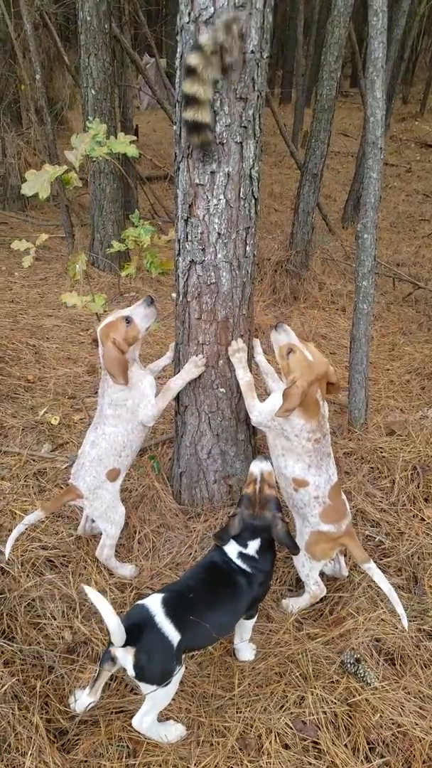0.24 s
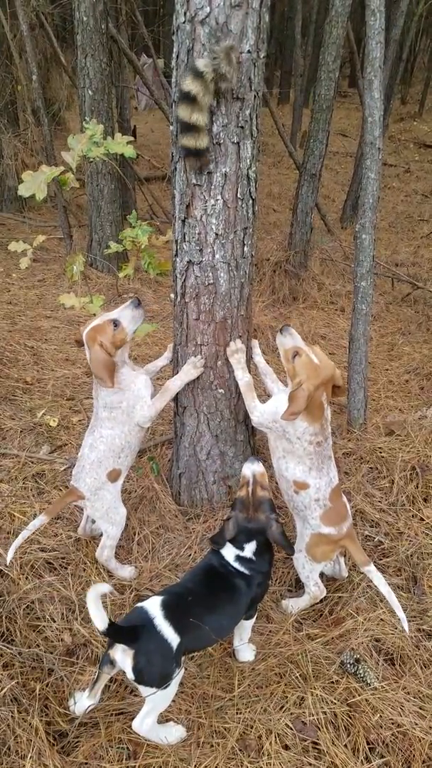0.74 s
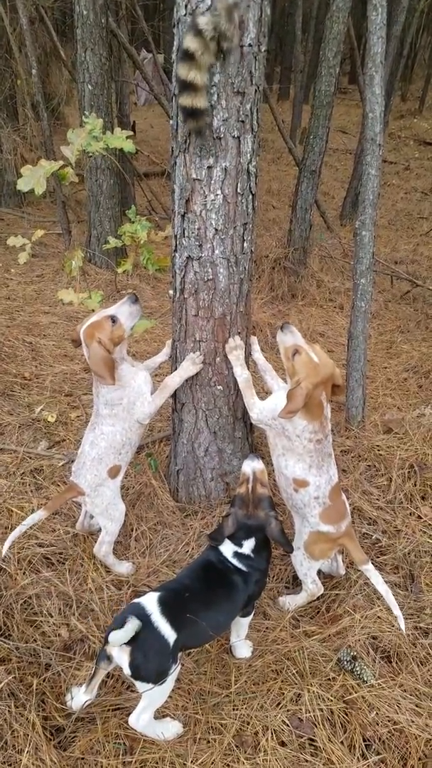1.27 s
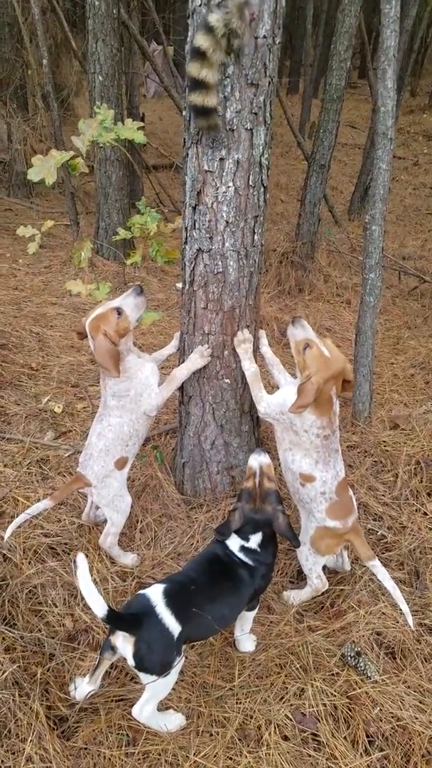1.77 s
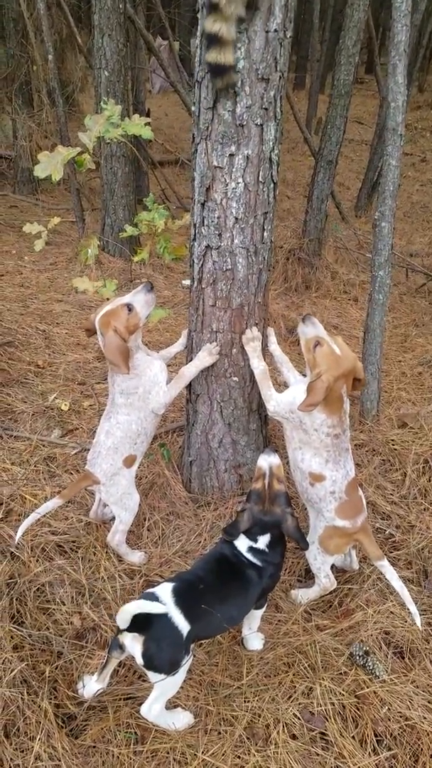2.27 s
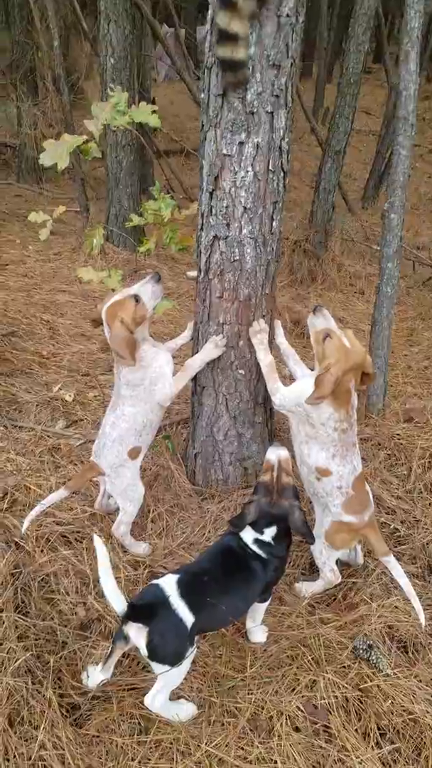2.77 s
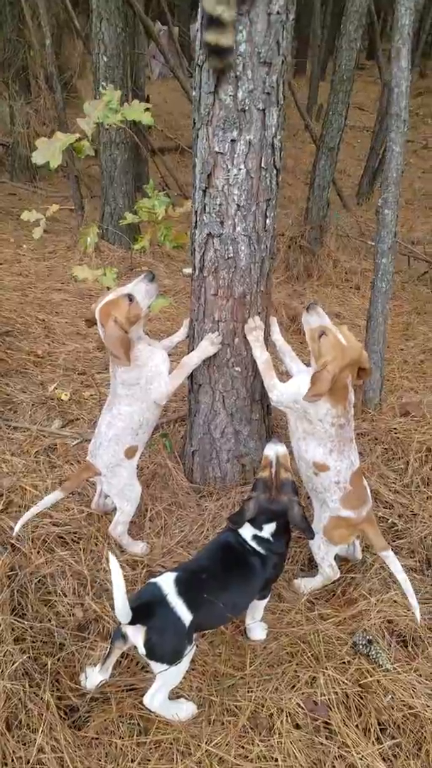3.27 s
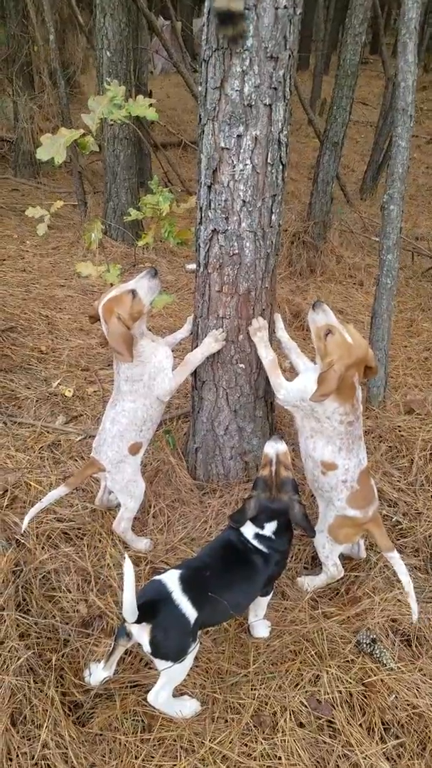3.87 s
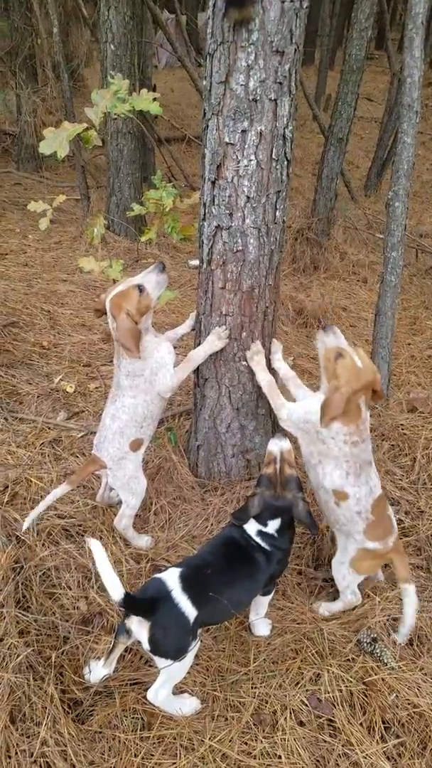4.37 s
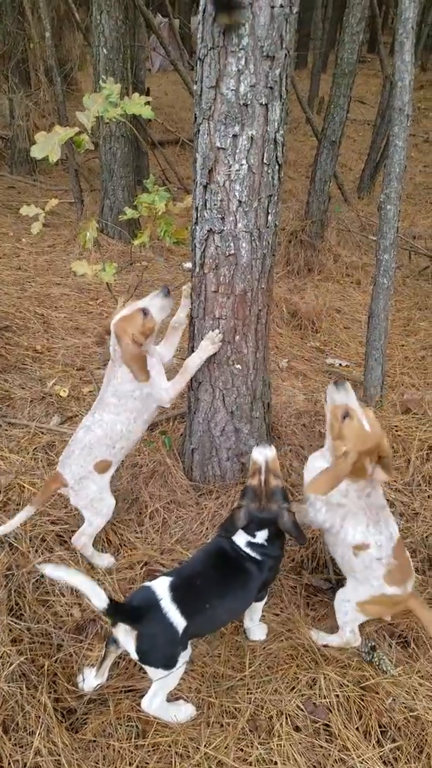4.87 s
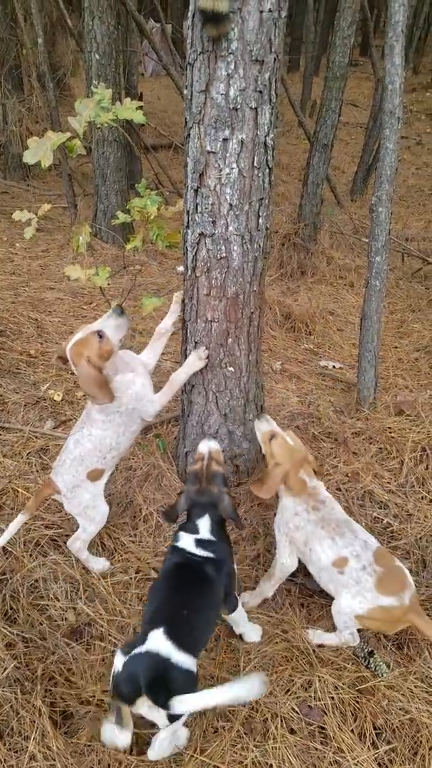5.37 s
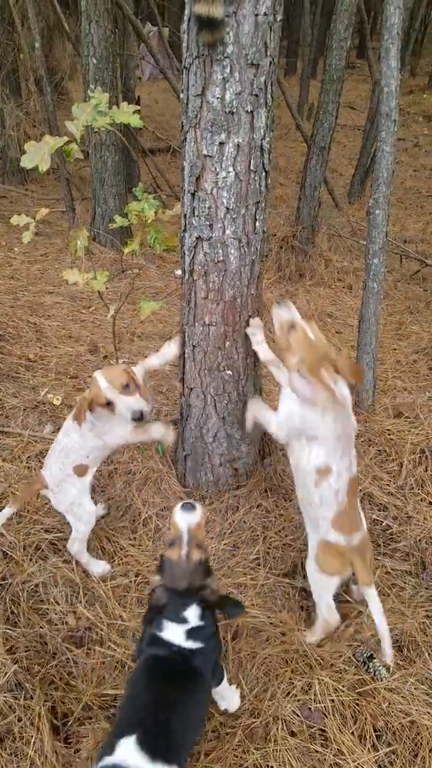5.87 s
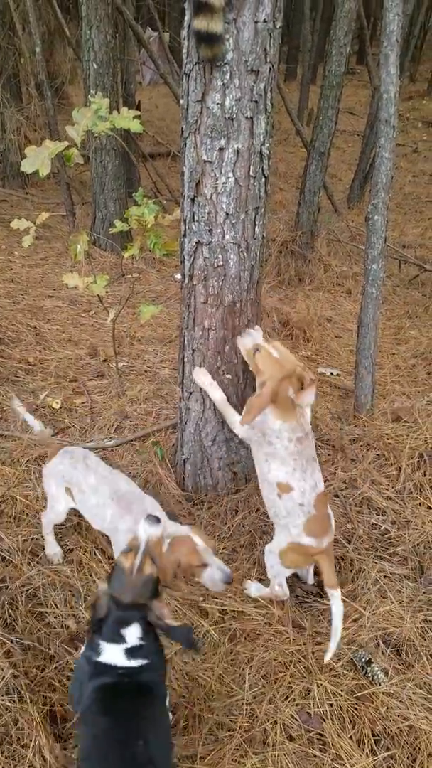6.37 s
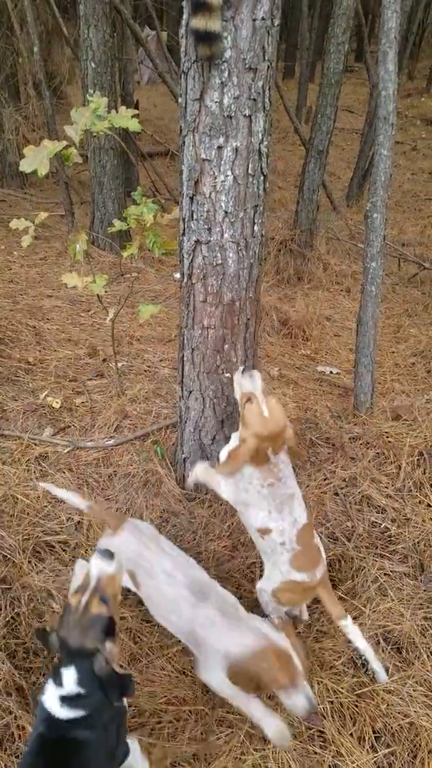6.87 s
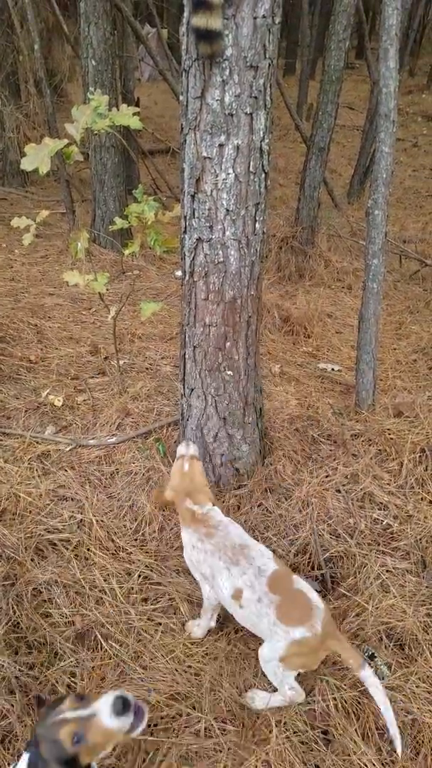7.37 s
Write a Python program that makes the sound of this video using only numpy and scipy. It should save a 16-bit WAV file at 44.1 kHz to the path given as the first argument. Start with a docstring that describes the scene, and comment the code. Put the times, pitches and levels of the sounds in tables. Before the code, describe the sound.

Quiet woodland air with a soft low rumble, and the tail of an earlier bay dying away. At about 0.2 and 0.8 s a hound slightly off bays: a tiny squeak, a bright nasal note, then a jump to a higher, duller one, echoing among trunks. From 1 to 3.5 s only echo, sparse crackles of paws on dry needles and very faint thin whines. Bays resume at 3.5, 4.2, 4.5 and 5.1 s, with low moans under some and busier claw scrabbling around 4.2 s. Close pups yelp, weakly at 4.4, then loud and cracking to hoarse at 4.9 s. Litter rustles hard at 5.5-5.7 s as another sharp yelp turns raspy. More yelps and rough barks come at 6.3, 6.7 and 7.2-7.4 s, among weaker bays at 6.1 and 6.9 s. Soft paw thumps fall near 4.5-4.7, 6 and 7.4 s; echoes linger at the end.

```python
"""Young hounds under a pine

One hound bays a little way off, each bay a squeak and two notes of summed sines echoing among the trunks.
Pups close by whine thinly, then yelp: gliding sines in the clear register, uneven pulses in the hoarse one.
Paws and claws crackle on dry needles and bark (bursts of random grains), pups land softly (short low sines),
and shaped noise makes the low outdoor rumble and air.
"""
import sys
import numpy as np
from scipy import signal
from scipy.fft import rfft, irfft
from scipy.io import wavfile

SR = 44100
rng = np.random.default_rng(int(sys.argv[2]) if len(sys.argv) > 2 else 0)


def put_to_file(sound):
    """Save the sound as 16-bit audio at rate SR, in the file named by the first command-line argument."""
    columns = np.atleast_2d(sound).T  # one column per channel
    safe = np.clip(columns, -1, 1)
    whole_steps = np.round(safe * 32767)
    wavfile.write(sys.argv[1], SR, whole_steps.astype(np.int16))


N = 336483
HZ = np.maximum(np.arange(N // 2 + 1) * SR / N, 1)
CUTOFF_HZ = 16350
NEAR_SINE = [(100, 0), (16000, -260)]   # throat of squeaks, moans and whines: Hz, dB


def from_db(db):
    """Gain of a level."""
    return 10 ** (np.asarray(db) / 20)


def rms_one(x):
    """Scaled to rms 1."""
    return x / np.sqrt(np.mean(x ** 2) + 1e-20)


def at_hz(points, hz):
    """A spectrum read on a log-frequency axis."""
    points = np.array(points)
    return np.interp(np.log(hz), np.log(np.maximum(points[:, 0], 1)), points[:, 1])


def span(rows):
    """Sample indices of a curve, and its columns sample by sample."""
    s, *columns = np.transpose(rows)
    at = np.arange(round(s[0] * SR), min(round(s[-1] * SR), N))
    return at, [np.interp(at / SR, s, c) for c in columns]


def edge_fade(at, fade_s):
    """Linear fade in and out over a run of samples."""
    return np.minimum(1, np.minimum(at - at[0], at[-1] - at) / (fade_s * SR))


def drift(size, rate_hz, count=1):
    """Rows of slow chance, rms 1 over all rows: white noise through a two-pole low-pass."""
    r = np.exp(-2 * np.pi * rate_hz / SR)
    noise = rng.standard_normal((count, size + 2000))
    return rms_one(signal.lfilter([1], [1, -2 * r, r * r], noise)[:, 2000:])


def coloured(x, gain):
    """x through a frequency response."""
    return irfft(rfft(x) * gain, N)


def above(x, hz):
    """Steep high-pass."""
    return signal.sosfilt(signal.butter(6, hz, "high", fs=SR, output="sos"), x)


def two_ears(x, balance_db, left_lead_rad):
    """Left and right of a near source: level and phase differ by frequency, summed power does not."""
    half = from_db(at_hz(balance_db, HZ) / 2) * np.exp(.5j * left_lead_rad)
    sides = np.array([half, 1 / half]) / np.hypot(abs(half), 1 / abs(half))
    return coloured(x, np.sqrt(2) * sides)


def clear_voice(calls, throat, waver, breath_db):
    """Sines on the pitch, higher partials following the throat; turbulence blurs every partial a little."""
    out = np.zeros(N)
    for rows in calls:
        at, (pitch, *levels) = span(rows)
        phase = 2 * np.pi * np.cumsum(pitch * (1 + waver * drift(len(at), 40)[0])) / SR
        # partials beyond the given ones continue from the last of them
        last = levels[-1] - at_hz(throat, len(levels) * pitch)
        levels += [last + at_hz(throat, k * pitch) for k in range(len(levels) + 1, 11)]
        k = np.arange(1, 11)[:, None]
        blur = 1 + from_db(breath_db) * (k - .8) * drift(len(at), 150, count=10)   # high partials tear most
        partials = from_db(levels) * blur * np.sin(k * phase) * (k * pitch < CUTOFF_HZ)
        out[at] += np.sqrt(2) * edge_fade(at, .0022) * np.sum(partials, axis=0)
    return out


def swells(table, end_db=-14, edge_db=-3):
    """Curves (s, Hz, dB, octave dB) of thin calls that fade in, are loudest in the middle and fade out."""
    share = np.array([0, .15, .5, .85, 1])
    shape_db = np.array([end_db, edge_db, 0, edge_db, end_db])
    curves = []
    for s, length_s, *hz, db, octave_db in table:
        pitch = np.interp(share, [0, .5, 1], hz)
        level = db + shape_db
        curves.append(np.transpose([s + share * length_s, pitch, level, level + octave_db]))
    return curves


# Baying hound. Each row: bright note start in seconds, its pitch in Hz, length in seconds, level in dB,
# octave over it in dB, squeak lead in seconds, squeak level in dB, jump after the start in seconds, dull note
# onset in Hz, pitch it glides to in Hz, its crest after the jump in seconds, crest level in dB.
# Levels are before the hound's gain in scene().
BAYS = [ (0.157, 436, 0.14, -30, -1.5, .022, -43, .078, 484.6, 536.7, 0.025, -20.5),
        (0.805, 469.3, 0.098, -26, -2.5, 0.023, -37.5, 0.048, 526.5, 534.5, 0.039, -19.5),
        (3.501, 495, 0.096, -23.5, -6.5, 0.026, -45.5, .038, 546, 541.8, 0.025, -24.5),
        (4.21, 479.3, 0.11, -19.5, -10.5, 0.021, -36.5, 0.029, 526.7, 540.3, 0.041, -23.5),
        (4.53, 442.1, .11, -26.5, -2, .025, -39, .08, 486.5, 535, 0.06, -21),
        (5.112, 437, 0.082, -34, 2.5, 0.039, -33, 0.044, 468.7, 518.3, 0.065, -20),
        (6.138, 425.8, 0.083, -42, 6.5, 0.021, -44.5, .057, 477, 497, 0.036, -26),
        (6.87, 426.4, 0.048, -35.5, -16, .02, -56, 0.027, 457, 490, 0.031, -32),
        (7.383, 396.5, 0.068, -35.5, -4.5, .02, -62, .04, 420, 428, .02, -48), ]
SQUEAK_RISE_S, SQUEAK_OVERLAP_S, SQUEAK_START_DB, SQUEAK_END_DB = .008, .0089, -8.5, -.5
SQUEAK_FROM, SQUEAK_TO = 3.05, 2.3   # multiples of the bright note's pitch
SWELL_SHARE, SWELL_FROM_DB, SWELL_TO_DB = .45, -7.5, -9   # the bright note swells and sinks
SWELL_BEND = 1.04   # and bends up as it sinks
JUMP_DB, CLIMB_S, DULL_FADE_S, DULL_FADE_DB = -8, .0596, .078, -16
DULL_SAG, DULL_OCTAVE_DB = .91, -12   # pitch multiple sagged towards, octave over the dull note


def bays():
    """Curves of falling squeak (s, Hz, dB), bright note, then higher dull note (s, Hz, dB, octave dB)."""
    squeaks, brights, dulls = [], [], []
    for (s, hz, length_s, db, octave_db, lead_s, squeak_db,
         jump_s, jump_hz, top_hz, crest_s, crest_db) in BAYS:
        start = s - lead_s
        squeaks.append([(start, SQUEAK_FROM * hz, squeak_db + SQUEAK_START_DB),
                        (start + SQUEAK_RISE_S, SQUEAK_FROM * hz, squeak_db),
                        (s + SQUEAK_OVERLAP_S, SQUEAK_TO * hz, squeak_db + SQUEAK_END_DB)])
        shape = [(0, 1, SWELL_FROM_DB), (SWELL_SHARE, 1, 0), (1, SWELL_BEND, SWELL_TO_DB)]
        brights.append([(s + share * length_s, bend * hz, db + d, db + d + octave_db)
                        for share, bend, d in shape])
        end = crest_s + DULL_FADE_S
        t = np.unique([0, crest_s, CLIMB_S, end])
        level = crest_db + np.interp(t, [0, crest_s, end], [JUMP_DB, 0, DULL_FADE_DB])
        pitch_hz = [jump_hz, top_hz, DULL_SAG * top_hz]
        pitch = np.interp(t, [0, CLIMB_S, max(end, CLIMB_S + 1e-3)], pitch_hz)
        dulls.append(np.transpose([s + jump_s + t, pitch, level, level + DULL_OCTAVE_DB]))
    return squeaks, brights, dulls


# Throat of the bright note. Each row: Hz, relative dB.
HOUND_THROAT = [(900, 0), (1300, -5), (1750, -14), (2150, -9), (2500, -33), (3100, -35), (3600, -46)]
# Throat of the dull note. Each row: Hz, relative dB.
NARROW_THROAT = [(1000, 10), (1500, -20.5), (2100, -13), (2500, -54.5), (3500, -44.5)]
# An earlier bay dying away. Each row of the curve: time in seconds, pitch in Hz, level in dB, octave level
# in dB; levels before the hound's gain in scene().
LINGER = [
    [(0.0, 437, -58.5, -56.5), (0.14, 433, -65.5, -62)],
]


def baying_hound():
    """Bright notes through the open throat, dull ones through the narrow throat, squeaks as near sines."""
    squeaks, brights, dulls = bays()
    notes = clear_voice(brights, HOUND_THROAT, waver=.008, breath_db=-15)
    notes += clear_voice(dulls + LINGER, NARROW_THROAT, waver=.008, breath_db=-5)
    return above(notes + clear_voice(squeaks, NEAR_SINE, waver=.024, breath_db=-8), 419)


# Low moans under some bays. Each row: start in seconds, length in seconds, onset, middle and end in Hz,
# mid level in dB, octave over it in dB.
MOANS = [ (3.5, 0.11, 303, 309, 290, -55.5, -26), (4.21, 0.13, 286, 290, 292, -50.5, -30),
         (4.44, 0.062, 336, 252, 207, -50.5, -30), (4.58, 0.23, 334, 285, 158, -50, -28), ]


def moans():
    """Low near sines with a wavering pitch."""
    return clear_voice(swells(MOANS), NEAR_SINE, waver=.046, breath_db=-11)


# Pups, clear register, one row per stretch between voice breaks. Each row: start in seconds, length in seconds,
# onset in Hz, turn after start in seconds, turn in Hz, end in Hz, level at turn in dB, level at end in dB,
# second and third partial over the fundamental in dB.
YELPS = [ (4.375, .052, 1655, .015, 1584, 1565, -33.5, -35, -16.5, -40),
         (4.84, .072, 1402, .014, 1249, 1173, -13, -10, -14, -38),
         (4.909, .1, 579.3, .02, 534.4, 582.6, -17.5, -11, -3.5, -19),
         (4.991, .08, 588, .04, 570, 526, -26, -17, 3, -13.5),
         (5.678, .073, 1510, .032, 1613, 1388, -8, -14, -18, -41.5),
         (5.706, 0.041, 789, 0.017, 782.6, 737, -12.5, -16, -30, -6.5),
         (6.256, 0.025, 1383, .013, 976, 1029, -21, -16.5, 6, -26),
         (6.278, .04, 1293, .012, 1387, 1252, -10.5, -18.5, -10.5, -46.5),
         (6.289, .035, 687, .012, 672, 686, -16.5, -27.5, 2, -1),
         (6.41, .055, 1478, .02, 1454, 1417, -32, -40, -24, -42),
         (6.621, .037, 1290, .014, 1034, 1143, -21.5, -17.5, -11.5, -35),
         (6.654, .028, 1244, .012, 1255, 1264, -12, -15.5, -17.5, -54),
         (6.697, .048, 657.5, .03, 683, 674, -14, -24.5, -26, -24),
         (6.757, .028, 683, .014, 668, 655, -15, -23, -29, -20),
         (6.788, .1, 1063, .025, 957, 648, -18.5, -33.5, -27, -33),
         (7.192, .05, 867, 0.011, 776.4, 735, -13, -11.5, -12, -18),
         (7.249, .065, 690, .03, 681, 690, -16.5, -19.5, -7.5, -28),
         (7.321, .02, 683, 0.014, 665, 637, -19, -15, -21, -40),
         (7.326, .043, 1148, 0.012, 1119, 994, -8, -10, -46, -43),
         (7.369, 0.02, 1010, .012, 745, 596, -22, -29, -25, -28), ]
# Throat for the partials above the third. Each row: Hz, relative dB.
PUP_THROAT = [(1200, -14.5), (1700, 0), (2200, -7.5), (2900, -30), (3500, -42.5), (5000, -45), (8000, -47),
              (13000, -61)]
YELP_ATTACK_S, YELP_ONSET_DB, YELP_RELEASE_S, YELP_RELEASE_DB = .009, -14, .006, -8


def yelps():
    """Sines with a quick attack, a glide that turns once and a short release."""
    calls = []
    for s, length_s, onset_hz, turn_s, turn_hz, end_hz, turn_db, end_db, second_db, third_db in YELPS:
        t = np.sort([0, YELP_ATTACK_S, turn_s, length_s, length_s + YELP_RELEASE_S])
        level = np.interp(t, [turn_s, length_s, t[-1]], [turn_db, end_db, end_db + YELP_RELEASE_DB])
        level[0] += YELP_ONSET_DB
        pitch = np.interp(t, [0, turn_s, length_s], [onset_hz, turn_hz, end_hz])
        calls.append(np.transpose([s + t, pitch, level, level + second_db, level + third_db]))
    return above(clear_voice(calls, PUP_THROAT, waver=.008, breath_db=-13.5), 400)


# Pups, hoarse register. Each row: pulse rate in Hz, its fall in Hz per second (negative rises), curve of
# time in seconds, level in dB, roughness (clipped to 0-1).
HOARSE = [ (524, -100, [(4.905, -7.5, .9), (4.935, -14, .6), (4.955, -24, .5), (4.975, -14, .8),
          (5.0, -35.5, 0.5)]), (267, 140.5, [(5.735, -8.5, 0.9), (5.76, -13, .13), (5.805, -10.5, .08),
          (5.82, -14, .75), (5.848, -14.5, 0.8), (5.885, -33, 0.8), (5.94, -50, 1.1)]),
          (251.4, 5.5, [(6.305, -30.5, 0.02), (6.32, -14, .34), (6.376, -13.5, 0.61), (6.405, -27.5, 0.8),
          (6.46, -46, 0.8)]), (325, -49, [(6.635, -29, 0.5), (6.68, -17.5, 0.8), (6.735, -13.5, 1.1)]),
          (244.4, -16.5, [(6.722, -17.5, 0.2), (6.765, -16.5, .4), (6.788, -21, 0.8), (6.795, -34, .3),
          (6.88, -40, 0.8)]), (341.7, 8, [(7.228, -5.5, 0.64), (7.245, -16.5, 1.09), (7.292, -13.5, 0.98),
          (7.335, -17, 0.5), (7.345, -35, 1.1), (7.39, -31, 1.2)]), ]
# Throat of the hoarse register. Each row: Hz, relative dB.
THROAT = [(120, -83), (200, -54.5), (487, -7.5), (735, -11), (1070, -1), (1560, -11), (1790, -9.5),
          (2660, -21), (3260, -52.5), (7060, -38.5), (12000, -56), (15600, -92), (22000, -120)]
MOUTH_OPEN_HZ, MOUTH_SHUT_HZ, MOUTH_CLOSES_S = 1360, 970, .052   # resonance sinks through each call
MOUTH_DB, MOUTH_WIDTH_HZ = 6, 300
JITTER, TEAR_HZ = .07, 110


def hoarse_voice():
    """Uneven glottal pulses: partials of a jittered pitch, shaped by the throat and a moving mouth resonance."""
    out = np.zeros(N)
    for start_hz, fall_hz_per_s, rows in HOARSE:
        at, (level_db, rough) = span(rows)
        t = (at - at[0]) / SR
        rate = start_hz - fall_hz_per_s * t
        mouth_hz = MOUTH_SHUT_HZ + (MOUTH_OPEN_HZ - MOUTH_SHUT_HZ) * np.exp(-t / MOUTH_CLOSES_S)
        rough = np.clip(rough, 0, 1)
        phase = 2 * np.pi * np.cumsum(rate * (1 + JITTER * rough * drift(len(at), 70)[0])) / SR
        k = np.arange(1, 45)[:, None]
        mouth = MOUTH_DB / (1 + ((k * rate - mouth_hz) / MOUTH_WIDTH_HZ) ** 2)
        gain = from_db(at_hz(THROAT, k * rate) + mouth)
        gain /= np.sqrt(np.sum(gain ** 2, axis=0) / 2)
        rough = np.clip(rough + (k * rate / 6000) ** 2, 0, 1)   # high partials tear most
        # no two pulses have the same shape
        torn = np.sqrt(1 - rough ** 2) + rough * drift(len(at), TEAR_HZ, count=44)
        # the throat smears each pulse
        pulses = np.sum(gain * torn * np.cos(k * phase + .25 * k ** 2), axis=0)
        out[at] += from_db(level_db) * pulses * edge_fade(at, .01)
    return above(out, 400)


# Pups, nasal whines. Each row: start in seconds, length in seconds, onset, middle and end in Hz,
# mid level in dB, octave over it in dB.
WHINES = [ (1.79, .19, 2800, 2860, 2830, -63.5, -16), (2.77, .15, 3400, 3290, 3500, -64, -9),
          (3.72, 0.23, 2900, 2800, 2900, -64, 3), (4.0, 0.18, 4730, 4760, 4430, -56, -7.5),
          (4.25, 0.17, 12300, 11200, 11400, -53, -30), (4.6, 0.058, 8100, 6530, 4800, -45.5, -30),
          (4.62, .14, 3950, 4120, 4450, -52, -23), (4.66, .17, 8300, 8740, 7300, -60, -30),
          (5.4, .125, 3597, 3240, 4100, -53.5, -20), (6.5, .13, 9820, 9800, 9740, -60, -24), ]


def whines():
    """Thin, breathy near sines."""
    return clear_voice(swells(WHINES), NEAR_SINE, waver=.012, breath_db=4)


# Pups, left over right. Each row: Hz, dB.
PUP_BALANCE_DB = [(300, 0.5), (600, -1.5), (1000, 4), (1300, 9), (1900, 0.5), (3800, -8), (7500, 11.5),
                  (15000, 24)]
# Pups, left ahead of right. Each row: Hz, radians.
PUP_LEAD_RAD = [(300, 0.14), (800, 0.4), (1200, -1.06), (1800, -1.94), (3200, 1.0)]


def near_pups(voices):
    """The pups reach the two ears with unlike level and phase."""
    return two_ears(voices, PUP_BALANCE_DB, at_hz(PUP_LEAD_RAD, HZ))


def crackle(grain_db, per_s):
    """Tiny breaks of uneven size at random times; rms 1."""
    sizes = from_db(grain_db * np.minimum(rng.exponential(1, N), 5)) * rng.standard_normal(N)
    return rms_one(sizes * (rng.random(N) < per_s / SR))


# Paws and claws. Each row: start in seconds, level in dB before the rise, 60 dB decay in seconds,
# body under the crackle in dB.
SNAPS = [(0.061, -31, .1, -7), (0.1496, -36, .04, -8), (0.2488, -33, .06, -12), (0.3676, -41, .05, -12),
         (0.9482, -36, .08, -14), (0.9936, -28, .05, -14), (1.3334, -46, .05, -14), (1.7315, -36, .03, -8),
         (2.0083, -36, .09, -5), (2.3545, -48, .025, -3), (2.8539, -42, .03, -8), (3.043, -44, .03, -6),
         (3.3154, -43, .04, -10), (3.5199, -44, .05, -10), (3.717, -37, .05, -16), (3.8214, -33, .08, -16),
         (4.0304, -32, .06, -20), (4.2063, -27, .06, -6), (4.2448, -31, .06, -6), (4.2872, -33, .08, -6),
         (4.3395, -34, .07, -6), (4.4298, -34, .07, -8), (4.6044, -36, .07, -6), (5.546, -27, .06, -8),
         (5.5767, -29, .05, -8), (5.6096, -35, .05, -8), (5.661, -33, .05, -5), (5.6795, -29, .06, -6),
         (6.0422, -39, .06, -12), (6.0876, -28, .07, -4), (6.1649, -35, .05, -8), (6.4218, -37, .05, -8)]
# Litter stirring. Each row: time in seconds, rustle level in dB before the clumping.
STIRRING = [(0.0, -84), (0.34, -71.5), (3.27, -79), (3.76, -59.5), (4.06, -67.5), (4.18, -50), (5.48, -57),
            (5.74, -42.5), (5.88, -56), (6.31, -55.5), (7.63, -61.5)]
# Litter spectrum. Each row: Hz, relative dB.
LITTER = [(800, -62.5), (1500, 2.5), (2300, -8.5), (3300, -8.5), (4100, -3.5), (5800, -4.5), (9700, -11),
          (15000, -4), (16500, -14.5)]
SNAP_RISE_S, BODY_HZ = .004, 4000
TICKS_PER_S, TICKS_DB = 40, -7   # lone needles breaking, relative to the rustle


def paws():
    """Each snap is a burst of crackle that swells and dies fast; lighter stirring goes on in clumps, with ticks."""
    bright, body = np.zeros(N), np.zeros(N)
    t = np.arange(6000) / SR
    for s, level_db, t60_s, body_db in SNAPS:
        at = round(s * SR)
        burst = from_db(level_db - 60 * t / np.clip(t60_s, .01, .2)) * (1 - np.exp(-t / SNAP_RISE_S))
        bright[at:at + 6000] += burst
        body[at:at + 6000] += burst * from_db(body_db)
    colour = from_db(at_hz(LITTER, HZ))
    low = 1 / (1 + (HZ / BODY_HZ) ** 4)
    high_part, low_part = coloured(crackle(grain_db=3, per_s=6000), colour * np.array([1 - low, low]))
    snaps = rms_one(high_part) * bright + rms_one(low_part) * body
    clumps_db = span(STIRRING)[1][0] + 4.5 * drift(N, 18)[0]
    rustle = rms_one(coloured(crackle(grain_db=3, per_s=3000), colour))
    ticks = rms_one(coloured(crackle(grain_db=2, per_s=TICKS_PER_S), colour * (1 - low)))
    return snaps + (rustle + from_db(TICKS_DB) * ticks) * from_db(clumps_db)


# Litter, left over right. Each row: Hz, dB.
LITTER_BALANCE_DB = [(1500, 2), (4000, 6.5), (8000, 11.5), (14000, 23)]
LITTER_LEAD_S = .000374   # left ahead of right


def near_litter(litter):
    """The litter reaches the left ear first and brighter."""
    return two_ears(litter, LITTER_BALANCE_DB, 2 * np.pi * HZ * LITTER_LEAD_S)


# Pups landing. Each row: start in seconds, level in dB (the envelope peaks about 12 dB under it), pitch in Hz.
THUDS = [(4.469, -42, 115), (4.521, -38, 111), (4.699, -33, 189), (5.978, -34, 111.7), (7.381, -32, 122)]


def landings():
    """Soft low pushes into the needle bed: sines that swell and die."""
    out, t = np.zeros(N), np.arange(5000) / SR
    envelope = t / .043 * np.exp(1 - t / .011)
    for s, level_db, hz in THUDS:
        at = round(s * SR)
        out[at:at + 5000] += from_db(level_db) * np.sin(2 * np.pi * hz * t) * envelope
    return out


# Decay of the woods, before the early boost. Each row: Hz, 60 dB decay in seconds.
WOODS_T60 = [(200, 3.48), (500, 3), (1000, 1.92), (2000, 2.14), (4000, 0.78), (10000, 0.23)]
EDGES_HZ = 20 * 2 ** np.arange(0, 10.1, .5)


def woods(x, build_s):
    """Scattering off many trunks: noise that builds up, then dies band by band, its own in each ear."""
    t, tail = np.arange(3 * SR) / SR, 0
    white = rng.standard_normal((2, 3 * SR))
    for low, high in zip(EDGES_HZ[5:-2:2], EDGES_HZ[7::2]):
        band = signal.sosfilt(signal.butter(2, [low, high], "band", fs=SR, output="sos"), white)
        tail = tail + band * from_db(-60 * t / at_hz(WOODS_T60, np.sqrt(low * high)))
    # the nearest trunks answer first and loudest
    tail = tail * (1 - np.exp(-t / build_s)) * (1 + 2.6 * np.exp(-t / .077))
    tail[1] += .16 * tail[0]   # the ears partly agree
    tail = tail / np.sqrt(np.sum(tail ** 2, axis=1, keepdims=True))
    return signal.fftconvolve(x[None], tail, axes=1)[:, :N]


# Bass of the air. Each row: time in seconds, rms level in dB.
RUMBLE = [(0.0, -57.5), (2.61, -62.5), (3.63, -74.5), (5.04, -57.5), (7.63, -66.5)]
# Spectrum of the air. Each row: Hz, relative dB.
AIR = [(12, -38.5), (20, -14), (44, -10.5), (96, -7.5), (174, -11), (535, -16), (670, -22), (939, -20.5),
       (5830, -33), (6910, -41.5), (15200, -26.5), (16500, -58)]
# Left-right likeness of the air. Each row: Hz, likeness 0-1.
LIKENESS = [(30, .97), (60, .96), (130, .93), (290, .8), (640, .3), (1400, .1), (3000, 0)]
AIR_DB, BASS_HZ = -65.5, 300   # steady part, split from the bass


def air():
    """Outdoor noise, most alike in both ears in the bass, where it swells and sinks; steady above."""
    alike = np.clip(at_hz(LIKENESS, HZ), 0, 1)
    mid, side = rfft(rng.standard_normal((2, N)))
    both = np.sqrt(1 + alike) * mid + np.sqrt(1 - alike) * side * [[1], [-1]]
    both = both * from_db(at_hz(AIR, HZ))
    bass = 1 / (1 + (HZ / BASS_HZ) ** 4)
    rumble = rms_one(irfft(both * bass, N)) * from_db(span(RUMBLE)[1][0])
    return rumble + from_db(AIR_DB) * rms_one(irfft(both * (1 - bass), N))


def scene():
    """Near pups and litter unlike in the two ears; the hound centred, farther off and wetter."""
    hound = baying_hound()
    pups = yelps() + hoarse_voice()
    litter = paws()
    near = near_pups(pups + whines()) + near_litter(litter)
    sent = from_db(-5) * hound + from_db(-27.5) * pups + from_db(-9) * litter
    echo = woods(sent, build_s=.011)
    return hound * from_db(2) + moans() + near + landings() + echo + air()


def record(dry):
    """Peaks near full scale are rounded, the top of the spectrum is cut."""
    rounded = dry / (1 + np.abs(dry / .93) ** 6) ** (1 / 6)
    return signal.sosfilt(signal.cheby2(22, 70, CUTOFF_HZ, fs=SR, output="sos"), rounded)


dry = scene()
out = record(dry)
put_to_file(out)
```